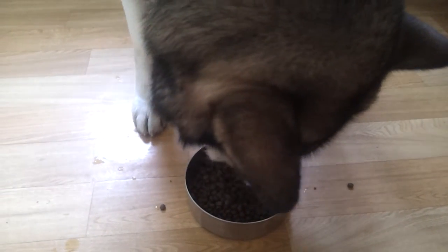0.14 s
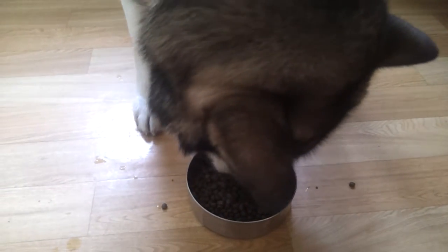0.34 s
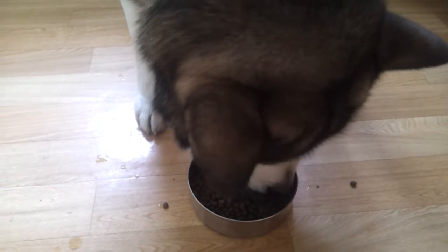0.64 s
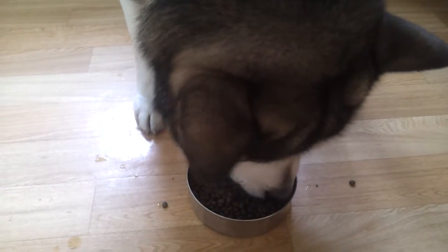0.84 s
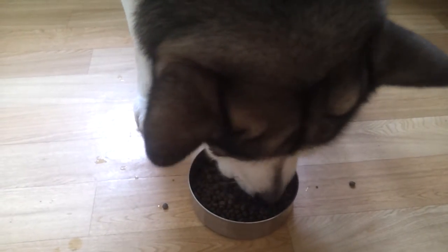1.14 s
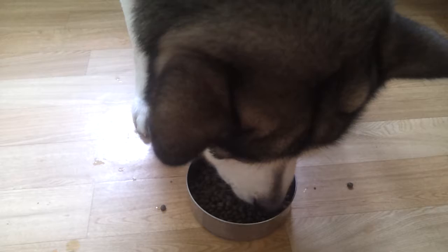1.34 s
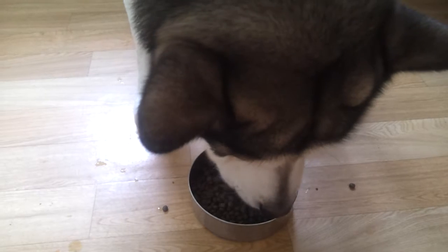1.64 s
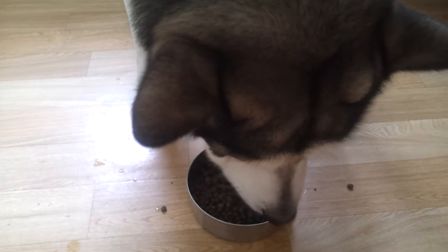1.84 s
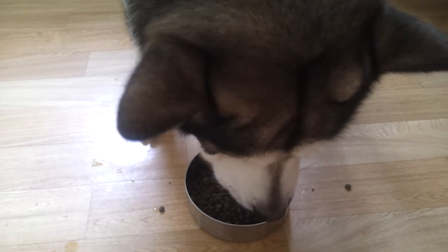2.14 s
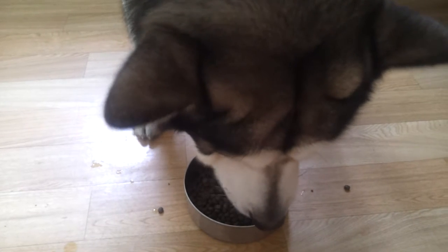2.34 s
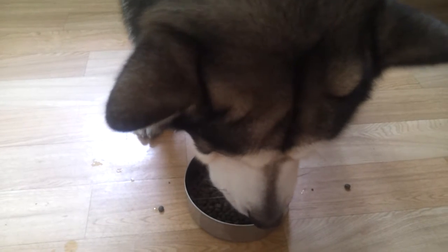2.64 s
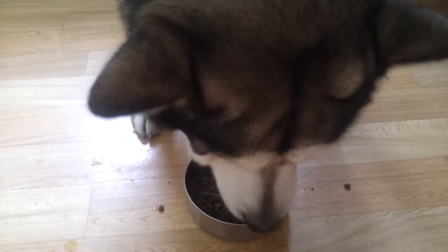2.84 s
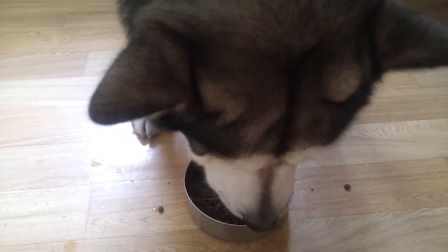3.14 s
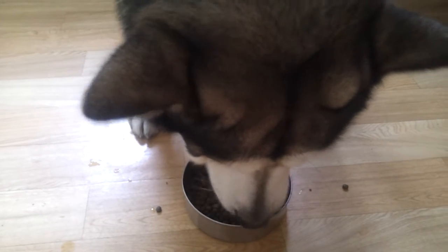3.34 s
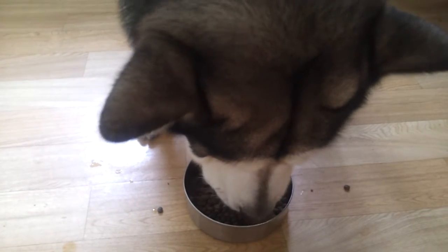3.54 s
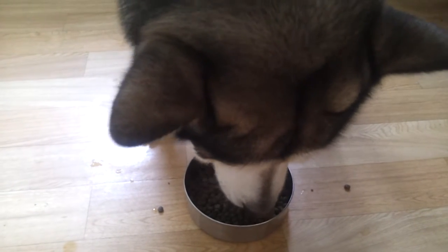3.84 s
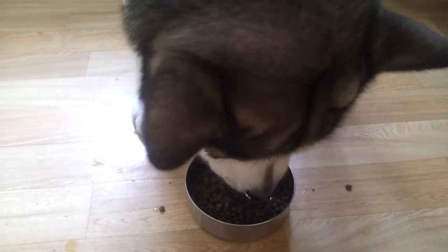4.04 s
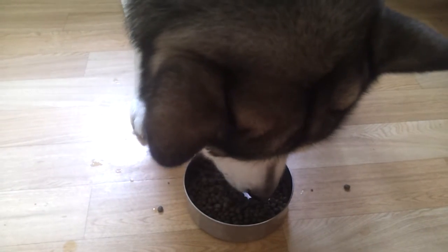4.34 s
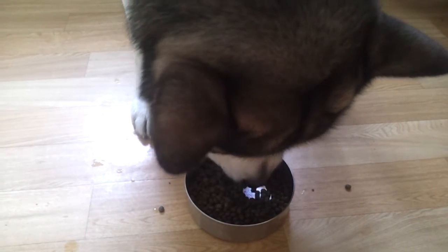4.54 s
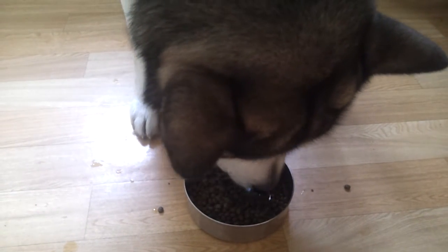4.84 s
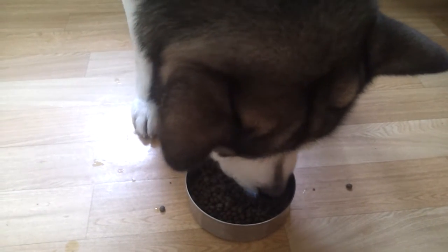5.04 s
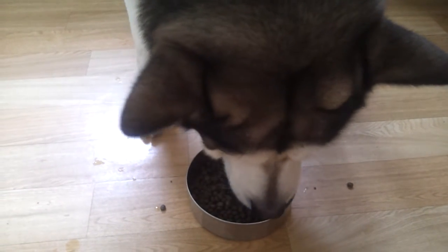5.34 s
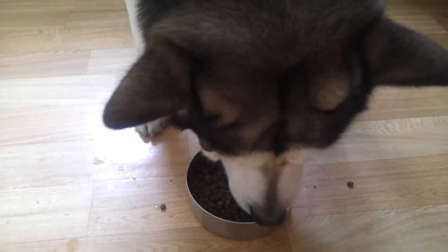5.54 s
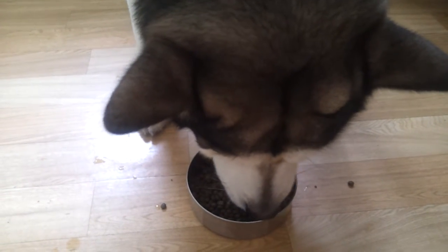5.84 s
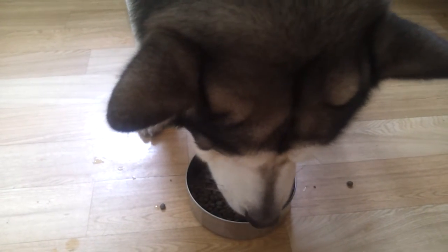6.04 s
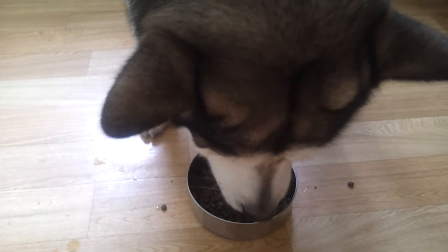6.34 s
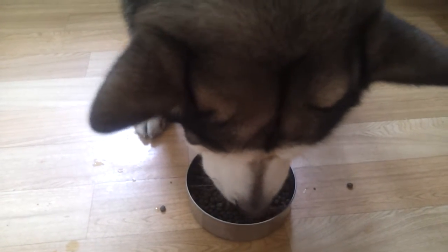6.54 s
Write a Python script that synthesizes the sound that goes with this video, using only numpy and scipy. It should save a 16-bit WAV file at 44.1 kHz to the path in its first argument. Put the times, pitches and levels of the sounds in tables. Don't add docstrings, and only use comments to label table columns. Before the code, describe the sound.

A dog eats dry kibble from a steel bowl, heard very close in stereo, in a small room with a short echo. A low fridge hum and soft hiss run throughout. The first half second is quiet, with faint lip slaps and skids. From 0.6 to 1.2 s pellets rattle and clink brightly on steel, with a very sharp crack at 0.75. Light skidding follows, then another hard metallic snap at 1.76. Around 2.0-2.1 and 2.4-2.6 hollow, wet jaw chomps crush pellets with dull thumps. A loud crunch lands at 2.97, smaller bites near 3.5, and a crack with chewing at 4.05-4.1. From 4.2 to 5.5 it is calmer: rustles, ticks, a few small clinks. Brittle snapping returns at 5.6-5.75, light clinks at 6.3, and heavy, wet crunching closes at 6.5-6.7.

```python
import sys
import numpy as np
from scipy import signal
from scipy.fft import rfft, irfft, next_fast_len
from scipy.io import wavfile
from scipy.ndimage import map_coordinates

SR = 44100
rng = np.random.default_rng(int(sys.argv[2]) if len(sys.argv) > 2 else 0)


def boost(x):
    u = np.asarray(x, float) / 20
    return 10 ** u


def dump(signal):
    limited = np.clip(np.atleast_2d(signal).T, -1, 1)
    pcm = np.round(limited * 32767).astype(np.int16)
    wavfile.write(sys.argv[1], SR, pcm)


N = 294588

# [f/Hz, level/dB]
BOWL_MODES = [(4950, -2), (5800, 0.5), (6300, 1.5), (6900, 3), (7500, -0.5), (8250, 4), (9200, -43),
              (10600, -6.5), (12500, -11)]
# [f/Hz, level/dB]
MUZZLE_MODES = [(1300, -1.5), (1750, -4.5), (2400, 7.5), (2950, 4.5), (3600, 6), (4250, 11)]
# [f/Hz, correlation]
LIKENESS = [(60, 0.59), (240, 0.78), (950, 0.37), (3770, -0.0), (15000, 0.045)]


def unit(x):
    return x / np.sqrt(np.mean(x ** 2) + 1e-20)


def along(points, hz):
    f, value = np.transpose(points)
    return np.interp(np.log(hz + 1), np.log(f + 1), value)


def wobble(rate):
    knots = rng.standard_normal(int(N * rate / SR) + 4)
    return map_coordinates(knots, [np.arange(N) * rate / SR])


def filtered(x, response):
    m = next_fast_len(N + SR // 4)
    return irfft(rfft(x, m) * response(np.fft.rfftfreq(m, 1 / SR)), m)[..., :N]


def grains(s, db, hz, cycles, lag_ms, size):
    s, db, hz = s.ravel(), db.ravel(), hz.ravel()
    lag, lean = rng.standard_normal((2, len(s), 1))
    step = np.arange(size)
    start = np.clip((s * SR).astype(int), 0, N)
    where = (start[:, None] + step).ravel()
    turns = (hz[:, None] * step / SR).astype(np.float32)
    decay = np.exp(-np.float32(np.log(1000) / cycles) * turns)
    soft_start = -np.expm1(-np.float32(1.2) * turns ** 2)
    shape = decay * soft_start
    shape *= (boost(db) / np.linalg.norm(shape, axis=1))[:, None]
    lead = lag * lag_ms * hz[:, None] / 1000

    def port(side):
        tone = np.sin((2 * np.pi * (turns + side * lead)).astype(np.float32))
        heard = boost(side * 1.2 * lean) * shape * tone
        return np.bincount(where, heard.ravel(), N + size)[:N]

    return np.array([port(1), port(-1)])


def struck(modes, shape, detune):
    first = rng.integers(len(modes), size=(shape[0], 1))
    turn = (first + np.arange(shape[1])) % len(modes)
    hz, db = np.transpose(modes)[:, turn]
    return hz * np.exp(detune * rng.standard_normal(shape)), db


def burst(s, db, length_ms, colour_db, first, early=0.205):
    draw = rng.standard_normal((len(s), 3, colour_db.shape[1])).transpose(1, 0, 2)
    wait = (draw[0] ** 2 + draw[1] ** 2) / 2
    wait[:, :first] *= 0.15
    wait[:, first:] += early * np.roll(draw[2], 1, axis=1)[:, first:]
    loud = colour_db + 2.8 * np.clip(draw[2], -2, 2) - 1.7 * wait
    loud -= 10 * np.log10(np.sum(boost(2 * loud), axis=1, keepdims=True))
    at = s[:, None] + wait * np.abs(length_ms)[:, None] / 1000
    return at, db[:, None] + loud


def air():
    # [f/Hz, density/dB per Hz]
    air_colour = [(12, -46), (30, -11), (60, -15), (116, -4), (166, -14), (226, -8.5), (430, -13.5),
                  (552, -18), (635, -13.5), (710, -21.5), (1390, -24), (2700, -25), (4500, -21.5),
                  (7590, -19), (11000, -26.5), (16000, -26.5)]

    def mid_side(hz):
        turn = np.arccos(np.clip(along(LIKENESS, hz), -1, 1)) / 2
        return boost(along(air_colour, hz)) * [np.cos(turn), np.sin(turn)]

    mid, side = filtered(rng.standard_normal((2, N)), mid_side)
    level_db = -47.5 + 0.66 * wobble(2.74) + 0.99 * wobble(24)
    return boost(level_db) * unit(np.array([mid + side, mid - side]))


def fridge():
    # [f/Hz, rms level/dB, waver/dB, phase drift/rad]
    motor_lines = [
        (59, -64, 4.5, 2),
        (115.3, -53, 3, .5),
        (215, -65.5, 2, 3.5),
        (229.2, -61.5, 4, 1.06),
        (299.5, -66.5, 1, 0.16),
    ]
    t = np.arange(N) / SR
    hum = np.zeros(N)
    for hz, db, waver_db, drift in motor_lines:
        strength = boost(db + 5.0 + waver_db * wobble(8))
        hum += strength * np.sin(2 * np.pi * hz * t + drift * wobble(7))
    return hum * np.ones((2, 1))


def room(x):
    # [f/Hz, t60/s]
    decay_times = [(200, 0.057), (800, 0.31), (4000, 0.13), (12000, 0.17)]
    out, hop = np.zeros((2, N + SR)), SR // 5
    gap = 130
    for k in range(0, N, hop):
        hz, t, z = signal.stft(rng.standard_normal((2, SR // 3)), SR, nperseg=128)
        turn = np.arccos(np.clip(along(LIKENESS, hz), -1, 1))[:, None] / 2
        z = np.cos(turn) * z[0] + np.sin(turn) * z[1] * [[[1]], [[-1]]]
        decay = boost(-60 * t / along(decay_times, hz)[:, None])
        tail = signal.istft(z * decay, SR, nperseg=128)[1]
        tail = tail / np.linalg.norm(tail[0])
        wet = signal.fftconvolve(x[None, k:k + hop], tail, axes=1)
        out[:, k + gap:k + gap + wet.shape[1]] += wet
    return out[:, :N]


def swarm(level_db, modes, count, cycles, spiky_db, size):
    at = rng.uniform(0, N / SR, (count, 1))
    hz, db = struck(modes, at.shape, 0.048)
    sizes = np.minimum(rng.exponential(size=at.shape), 3.5)
    patter = grains(at, db + spiky_db * sizes, hz, cycles, lag_ms=0.11, size=size)
    clumps = boost(2.6 * wobble(30))
    return boost(level_db) * unit(patter * clumps)


def stirring():
    # [t/s of greatest force, rustle on steel/dB, grind in mouth/dB, wet cavity/dB]
    pushes = [(.05, -58, -73, -61.5), (.53, -50, -60, -58.5), (.69, -37, -38.5, -54),
              (.81, -40, -46.5, -64), (.93, -35.5, -43.5, -57), (1.16, -40, -42.5, -51),
              (1.56, -43, -53, -69), (1.8, -41, -47.5, -59), (1.96, -43, -44.5, -46.5),
              (2.1, -53, -55, -52), (2.38, -44.5, -56, -52), (2.53, -46, -44, -50), (2.86, -45.5, -44, -56),
              (3.01, -59, -60, -51), (3.42, -45, -52, -58), (3.8, -47, -54, -53), (3.98, -44, -50, -51),
              (4.33, -47, -54, -61), (4.79, -47, -55, -58.5), (4.99, -55, -51.5, -52.5),
              (5.48, -46, -43, -66), (5.7, -38, -38.5, -45.5), (5.98, -55, -51.5, -53),
              (6.31, -56, -52, -64), (6.47, -47, -45.5, -47.5), (6.55, -55, -47.5, -43),
              (6.66, -61, -56, -42)]
    # [f/Hz, level/dB]
    cavity_modes = [(600, -8.5), (780, 2), (900, -7), (1010, -6.5)]
    s, rustle_db, grind_db, wet_db = np.transpose(pushes)
    t = np.arange(0, N + 200, 200) / SR
    after = t - s[:, None]

    def swell(peak_db, rise, fall, rest_db):
        loss_db = np.where(after < 0, -rise, fall) * after
        level = np.maximum(rest_db, np.max(peak_db[:, None] - loss_db, axis=0))
        return np.interp(np.arange(N) / SR, t, level)

    rustle_level = swell(rustle_db, rise=116, fall=106, rest_db=-64) - 5.0
    grind_level = swell(grind_db, rise=144, fall=135, rest_db=-66) - 1.5
    wet_level = swell(wet_db, rise=84, fall=56, rest_db=-64) - 6.0
    rustle = swarm(rustle_level, BOWL_MODES, count=14000, cycles=64.0, spiky_db=-2.0, size=100)
    grind = swarm(grind_level, MUZZLE_MODES, count=6000, cycles=33, spiky_db=0.5, size=220)
    wet = swarm(wet_level, cavity_modes, count=1500, cycles=11.0, spiky_db=0.5, size=900)
    return rustle + grind + wet


def pips():
    # [t/s, energy/dB, f/Hz]
    crumb_pops = [
        (2.657, -29, 2700),
        (2.696, -23, 4020),
        (4.066, -33, 2300),
        (4.553, -23.5, 2330),
        (6.063, -35, 4300),
        (6.076, -20, 4330),
        (3.217, -23, 2850),
        (4.3, -34, 2700),
        (4.466, -28, 3400),
    ]
    s, db, hz = np.transpose(crumb_pops)
    return grains(s, db, hz, cycles=19, lag_ms=0.025, size=300)


def splinters(rows, over_db, ms, spread, cycles, size):
    s, db, hz = np.transpose(rows)
    off = rng.standard_normal((len(s), 6))
    at, loud = burst(s, db + over_db, np.full(len(s), ms), -1.5 * off ** 2, first=3, early=0)
    return grains(at, loud, hz[:, None] * np.exp(spread * off), cycles, lag_ms=0.027, size=size)


def pops():
    # [t/s, peak level/dB, cavity f/Hz]
    mouth_pops = [(1.904, -38, 800), (1.931, -38, 891), (1.96, -35, 848), (1.97, -37, 883),
                  (1.991, -39, 950), (2.019, -38, 720), (2.0885, -26, 760), (2.078, -23, 770),
                  (2.337, -38, 877), (2.367, -38, 869), (2.423, -32, 797), (2.491, -28, 700),
                  (2.535, -27, 616), (2.545, -28, 608), (2.566, -33, 589), (3.008, -33, 805),
                  (3.438, -38, 867), (3.529, -34, 533), (1.944, -35, 890), (5.663, -33, 790),
                  (5.683, -35, 794), (5.692, -35, 800), (6.545, -32, 964), (6.556, -35, 842),
                  (6.617, -27, 760), (6.661, -32, 1050), (6.668, -26, 694)]
    return splinters(mouth_pops, over_db=14, ms=1.62, spread=0.12, cycles=10, size=800)


def chips():
    # [t/s, peak level/dB, f/Hz]
    muzzle_chips = [(.7219, -25, 3820), (.7374, -24, 2960), (.7536, -17, 3640), (.7978, -24, 2900),
                    (.8534, -23, 2360), (.9064, -24, 4100), (.9458, -29, 4110), (1.6592, -28, 2320),
                    (1.7828, -31, 2390), (1.8163, -32, 3870), (1.9694, -30, 2220), (2.3374, -33, 2800),
                    (2.3844, -30, 2740), (2.493, -24, 2960), (2.5164, -31, 2330), (2.5634, -32, 2210),
                    (2.9304, -23, 2600), (2.9848, -19, 2500), (3.5026, -22, 2320), (3.5262, -25, 2220),
                    (3.9862, -24, 2200), (4.0667, -30, 2590), (4.1198, -25, 3590), (5.6616, -19, 4200),
                    (5.7034, -23, 2650), (5.7364, -30, 2400), (5.7887, -33, 3790), (6.29, -27, 4160),
                    (6.4684, -30, 3870), (6.4874, -33, 3180), (6.5354, -18, 3700), (6.5824, -32, 4070),
                    (6.6194, -32, 3630)]
    return splinters(muzzle_chips, over_db=8, ms=1.0, spread=0.17, cycles=6.5, size=260)


def shards():
    # [t/s, peak level/dB, f/Hz]
    steel_shards = [(.652, -21, 6500), (.6754, -17, 8000), (.6983, -19, 5800), (.7219, -17, 5970),
                    (.7538, -6, 6800), (.7862, -27, 5600), (.8028, -24, 6760), (.8224, -20, 7500),
                    (.8418, -22, 6960), (.8682, -22, 6500), (.8803, -29, 8300), (.9148, -12, 6270),
                    (1.1272, -19, 6100), (1.1616, -19, 5700), (1.2002, -23, 5600), (1.7555, -9, 6800),
                    (1.7597, -12, 7360), (1.79, -21, 6920), (1.8066, -28, 7870), (1.8748, -24, 6500),
                    (2.2613, -31, 5860), (2.97, -11, 4770), (2.9824, -26, 4800), (3.4356, -29, 7430),
                    (3.4972, -22, 4800), (3.9456, -29, 7950), (4.0437, -17, 5740), (4.4936, -21, 6840),
                    (4.4968, -29, 7080), (4.7728, -24, 6800), (4.8086, -29, 6460), (5.0498, -29, 7300),
                    (5.5018, -21, 7900), (5.5728, -23, 6900), (5.6166, -26, 6500), (5.6557, -27, 4990),
                    (5.6994, -16, 8050), (6.355, -28, 4620), (6.4557, -23, 5200), (6.5358, -27, 5800),
                    (6.6058, -12, 5190)]
    return splinters(steel_shards, over_db=7.5, ms=0.63, spread=0.12, cycles=20, size=150)


def needles():
    # [t/s, energy/dB, f/Hz, left minus right/dB]
    sharp_cracks = [(0.7537, 0, 6040, -8), (.76, -8, 6600, 0), (.9208, -19, 4500, -2), (.958, -21, 6700, 0),
                    (1.1808, -15, 5400, 1), (1.45, -25, 4500, 0), (1.648, -28, 4500, 0),
                    (1.71, -27, 2300, 0), (1.7596, -1, 6400, -1), (1.7702, -12, 6000, -3),
                    (2.4756, -11, 2400, -2), (2.9707, 0.5, 2920, 6), (3.023, -15, 2200, -4),
                    (4.0441, -10, 2200, -1), (4.0997, -7.5, 3100, -11), (5.195, -28, 6500, 0),
                    (5.682, -18, 7500, -3), (5.72, -18, 5900, -2), (5.7272, -17, 6500, 5),
                    (5.7437, -9, 4300, 4), (6.6375, -5, 4480, 2), (6.6478, -11, 4600, 1)]
    out = np.zeros((2, N))
    for s, db, hz, lean_db in sharp_cracks:
        crack = grains(np.array([s]), np.array([db]), np.array([hz]), cycles=5.5, lag_ms=0.005, size=120)
        out += boost(np.array([[0.5], [-0.5]]) * lean_db) * crack
    return out


def slaps():
    # [t/s, energy/dB, cavity f/Hz, burst length/ms]
    lip_slaps = [(.184, -42, 730, 11.5), (.36, -36.5, 770, 11.3), (.678, -26, 804, 13.2),
                 (.753, -32, 874, 2.5), (.918, -34, 1120, 8.6), (1.167, -37, 1170, 15),
                 (1.943, -32.5, 885, 4.6), (2.324, -40, 834, 3.3), (2.404, -38, 810, 2),
                 (3.172, -35, 684, 7.7), (3.436, -34, 777, 6.7), (3.93, -33.5, 860, 8.4),
                 (4.507, -40, 560, 8), (4.587, -34.5, 570, 2.6), (5.351, -32.5, 855, 2.3),
                 (5.393, -32, 740, 2.5), (5.664, -35, 790, 5.6), (6.289, -35, 705, 3.6),
                 (6.432, -30, 776, 2.9), (6.477, -39, 765, 8.4)]
    s, db, cavity_hz, ms = np.transpose(lip_slaps)
    off = rng.standard_normal((len(s), 8))
    at, loud = burst(s, db + 18.0, 0.76 * ms, -1.5 * off ** 2, first=2)
    hz = cavity_hz[:, None] * np.exp(0.052 * off)
    return grains(at, loud, hz, cycles=15.0, lag_ms=0.013, size=900)


def chomps():
    # [t/s, energy/dB, cavity f/Hz, burst length/ms]
    jaw_closures = [(2.0, -33.5, 668, 12.5), (2.03, -38, 770, 4.8), (2.072, -19.5, 727, 7),
                    (2.43, -31, 765, 7.5), (2.4435, -19.5, 800, 11.3), (2.478, -21.5, 694, 9.9),
                    (2.524, -18.5, 603, 10.4), (2.544, -30, 630, 2.5), (2.556, -30, 624, 8),
                    (2.952, -28.5, 900, 3.6), (2.967, -19.5, 750, 4.6), (3.019, -23, 630, 10),
                    (3.053, -34, 686, 8.1), (3.449, -32.5, 840, 4.7), (3.487, -25.5, 600, 9.6),
                    (3.504, -30.5, 1200, 11.2), (3.528, -32.5, 497, 3.66), (4.066, -37, 614, 2.9),
                    (4.094, -22, 510, 6.16), (4.12, -31.5, 890, 10), (6.521, -15, 806, 2.7),
                    (6.583, -31, 810, 8.7), (6.604, -19, 741, 3.47), (6.637, -16.5, 695, 4.54),
                    (6.648, -22, 750, 2.5)]
    # [f/Hz, level/dB]
    skull_modes = [(150, 0.5), (215, 6), (270, 5.5), (350, 8)]
    s, db, cavity_hz, ms = np.transpose(jaw_closures)
    off = rng.standard_normal((len(s), 24))
    at, loud = burst(s, db + 17.5, 0.7 * ms, -1.5 * off ** 2, first=2)
    hz = cavity_hz[:, None] * np.exp(0.13 * off)
    ring = grains(at, loud, hz, cycles=9.2, lag_ms=0.013, size=800)
    thump_db = db - 10 - 16.5 * np.log2(cavity_hz / 680)
    hz, mode_db = struck(skull_modes, (len(s), 8), 0.11)
    at, loud = burst(s, thump_db + 21.5, 0.5 * ms, mode_db, first=4)
    thump = grains(at, loud, hz, cycles=8.5, lag_ms=0.022, size=1400)
    return ring + thump


def breaks():
    # [t/s, mouth energy/dB, steel energy/dB, burst length/ms, brightness f/Hz]
    clinks = [(0.5867, -54.5, -25, 2.2, 9600), (0.658, -30, -17, 3.6, 8100), (0.6967, -26, -21, 5.9, 7400),
              (0.7075, -26, -19, 2.4, 7300), (0.7225, -23, -19.5, 1.6, 6600),
              (0.7541, -14.5, -12, 2.2, 6730), (0.8362, -33, -20.5, 2.65, 7800),
              (0.9016, -30, -24.5, 1.35, 5860), (0.9156, -28, -26, 3.8, 6400),
              (0.9318, -21.5, -14.5, 3.23, 7140), (1.1268, -26, -20.5, 2.6, 6560),
              (1.144, -24.5, -13.5, 1.7, 7800), (1.18, -27.5, -21.5, 1.9, 6400),
              (1.7592, -19.5, -10, 4.45, 6960), (4.0438, -18.5, -16, 1.15, 6750),
              (4.77, -34.5, -24, 7.2, 7200), (5.5735, -31.5, -23, 3.8, 7300),
              (5.6765, -26, -16.5, 0.86, 7250), (5.6995, -30, -20, 3.5, 7100),
              (5.743, -21.5, -18, 2.67, 7000), (5.9693, -35, -22, 5.5, 7200),
              (6.2904, -27.5, -21, 3.1, 7240), (6.3039, -28, -23.5, 1.05, 6540),
              (6.312, -33, -25.5, 5.8, 8800)]
    # [t/s, mouth energy/dB, steel energy/dB, burst length/ms]
    bites = [(1.954, -29, -39, 1.67), (2.0048, -29, -39.5, 4), (2.0723, -27, -44, 3.4),
             (2.0776, -22.5, -32.5, 1.92), (2.4433, -26, -63, 2.6), (2.449, -27, -35, 7.9),
             (2.4755, -33, -33, 1.1), (2.478, -20, -36, 3.4), (2.4917, -34, -38, 2),
             (2.5254, -17.5, -28, 3.23), (2.5469, -25, -36, 3.7), (2.9055, -31.5, -34.5, 3.6),
             (2.9695, -11.5, -18.5, 4.35), (3.021, -21, -33, 3.03), (3.0441, -24.5, -32.5, 7),
             (3.4352, -32.5, -33.5, 3.5), (3.4888, -23.5, -33, 2.5), (3.4959, -22, -30, 4.9),
             (3.528, -27, -32, 5.3), (3.9868, -27.5, -33, 4.2), (4.0953, -21, -49, 1.6),
             (4.0992, -26, -29, 2.4), (5.6604, -27, -27, 2.26), (5.7257, -26.5, -33, 2.8),
             (6.4547, -28, -28.5, 6), (6.4864, -32.5, -42, 6), (6.5226, -19, -26, 2.4),
             (6.606, -14.5, -22.5, 2.8), (6.6367, -16, -20.5, 2.7), (6.648, -26, -40, 2.7)]
    # [t/s, mouth energy/dB, steel energy/dB]
    ticks = [(0.122, -50, -34.5), (.632, -52, -31), (0.6754, -32, -29), (0.798, -29, -25),
             (0.819, -32, -23.5), (0.8535, -31, -39), (0.8676, -31.5, -31), (1.085, -34.5, -29),
             (1.113, -28.5, -33), (1.162, -44, -27), (1.218, -39, -29.5), (1.659, -35, -55),
             (1.755, -38, -33), (1.8743, -38, -32), (2.099, -36, -25), (2.326, -34.5, -46),
             (2.3939, -33, -46), (2.7202, -38, -39), (3.122, -50, -36.5), (3.828, -37.5, -29.5),
             (4.4061, -32.5, -31), (4.4937, -34.5, -31), (4.9826, -36, -60), (5.0508, -36.5, -26),
             (5.4995, -52, -31), (5.6166, -37, -27.5), (5.965, -47, -35), (6.1867, -35, -30.5),
             (6.355, -31, -32.5), (6.603, -24, -34)]
    # [t/s, mouth energy/dB, steel energy/dB]
    skids = [(0.303, -47, -32), (0.494, -36, -33), (.509, -33.5, -34), (.542, -37, -28.5),
             (1.061, -35.5, -34), (1.3629, -32, -37.5), (1.458, -34, -45), (1.5432, -51, -31),
             (1.581, -37, -28.5), (1.816, -38, -32), (1.9687, -34, -40), (2.2068, -37, -36),
             (2.364, -32, -33), (2.805, -43, -35), (2.831, -34.5, -32), (3.2499, -35, -38),
             (3.3286, -41, -29), (3.361, -35, -29.5), (3.4138, -36.5, -49), (3.445, -31, -34),
             (3.755, -39, -37), (3.944, -59, -32.5), (3.9656, -36, -33), (4.2272, -61, -33),
             (4.332, -39, -34), (4.806, -38, -34), (4.9571, -49, -38), (5.161, -37, -35),
             (5.455, -32.5, -33), (5.4863, -39.5, -28)]
    tick_ms, skid_ms = 3, 10.5
    plain = list(bites)
    plain += [(*row, tick_ms) for row in ticks]
    plain += [(*row, skid_ms) for row in skids]
    s, mouth_db, steel_db, ms = np.transpose(plain)
    hz = 6600 + 47 * (steel_db - mouth_db) - 44 * (mouth_db + 26.5)
    return np.hstack([np.transpose(clinks), [s, mouth_db, steel_db, ms, np.clip(hz, 4800, 9200)]])


def cracks():
    s, mouth_db, steel_db, ms, centre_hz = breaks()
    early = np.where(steel_db > mouth_db, 0.04, 0.2)[:, None]

    hz, mode_db = struck(BOWL_MODES, (len(s), 63), 0.017)
    tilt_db = 38 * np.log2(centre_hz / 7300)[:, None] * np.log2(hz / 7300)
    at, loud = burst(s, steel_db + 18.5, 1.05 * ms, mode_db + tilt_db, first=5, early=early)
    steel = grains(at, loud, hz, cycles=28.5, lag_ms=0.053, size=150)

    force_db = steel_db - 10 * np.log10(np.abs(ms))
    snap_db = steel_db + 10.0 + 2.3 * np.minimum(force_db + 10, 0)
    steel += grains(s, snap_db, 0.72 * centre_hz, cycles=1.6, lag_ms=0.0088, size=60)

    hz, mode_db = struck(MUZZLE_MODES, (len(s), 42), 0.057)
    depth = np.clip(np.log2(centre_hz / 6600), -0.4, 0.22)[:, None]
    tilt_db = 15 * depth * np.log2(hz / 2500)
    at, loud = burst(s, mouth_db + 18.0, 1.05 * ms, mode_db + tilt_db, first=3, early=early)
    mouth = grains(at, loud, hz, cycles=9.7, lag_ms=0.039, size=260)
    return steel, mouth


def scene():
    steel, mouth = cracks()
    steel = steel + shards()
    mouth = mouth + chips()
    jaws = chomps() + slaps() + pops()
    patter = stirring() + pips()
    sent = boost(-0.5) * steel + boost(-3.5) * mouth + boost(-11) * jaws + boost(0.5) * patter
    dog = steel + mouth + jaws + patter
    return dog + room(sent.mean(0)) + fridge() + air() + needles()


def roll_off(x):
    return signal.sosfilt(signal.butter(12, 15820, fs=SR, output="sos"), x)


def record(dry):
    # [f/Hz, left minus right/dB]
    port_lean = [(60, -0.5), (240, 0.5), (950, -1.5), (3770, 0), (15000, -3)]
    # [f/Hz, level/dB]
    band_limit = [(14300, 0), (14700, -6), (15300, -29), (16500, -55)]

    def ports(hz):
        return boost(along(port_lean, hz) * [[0.5], [-0.5]] + along(band_limit, hz))

    return roll_off(filtered(dry, ports))


dry = scene()
out = record(dry)
dump(out)
```